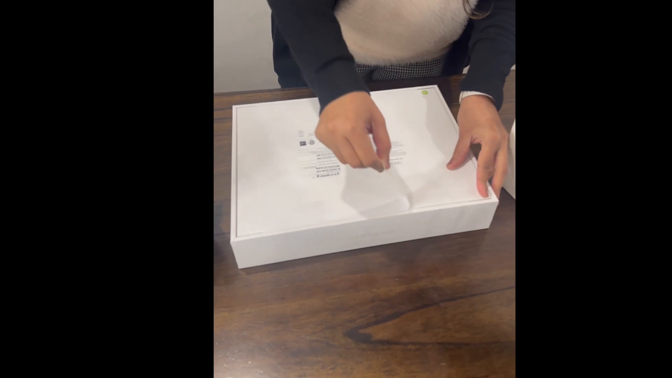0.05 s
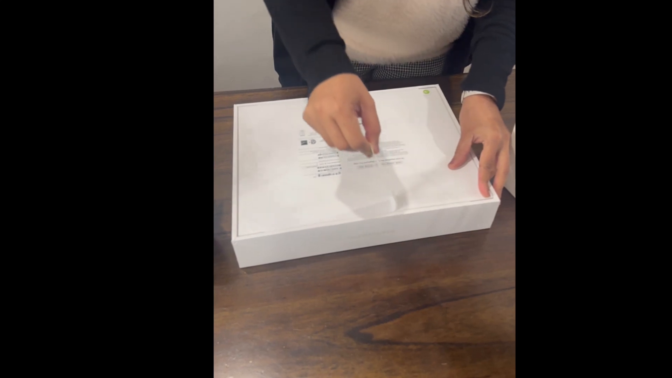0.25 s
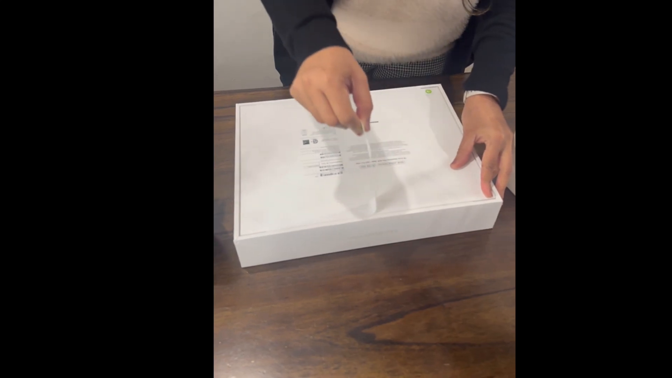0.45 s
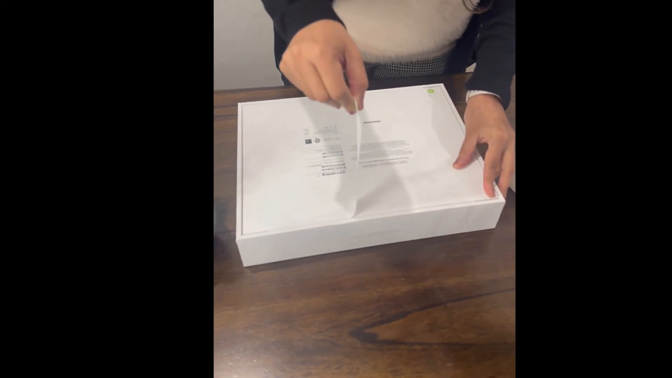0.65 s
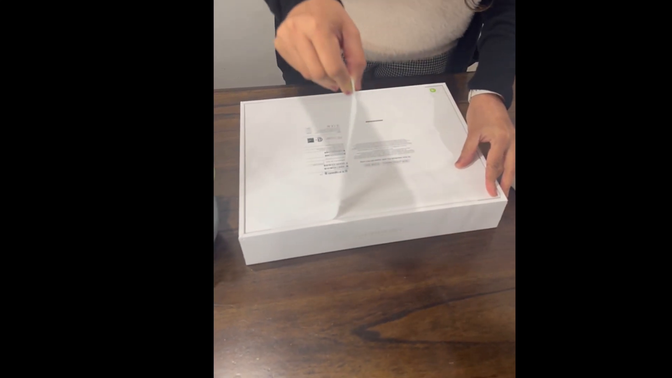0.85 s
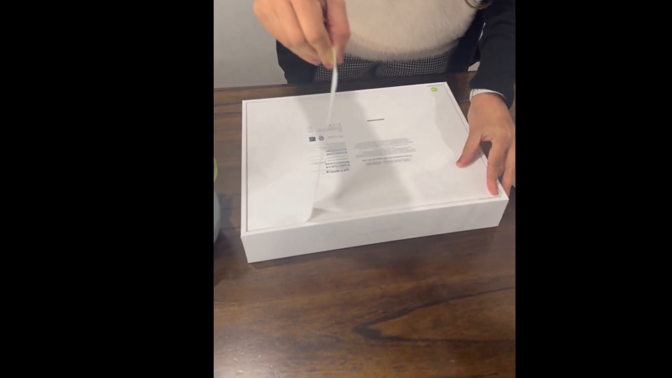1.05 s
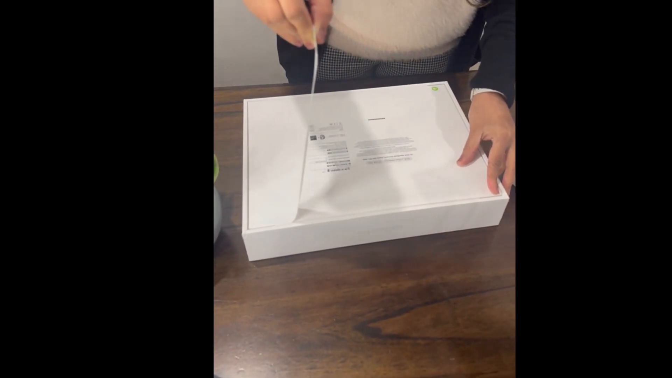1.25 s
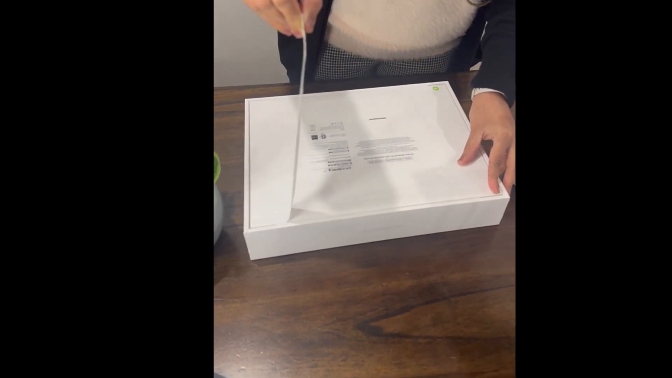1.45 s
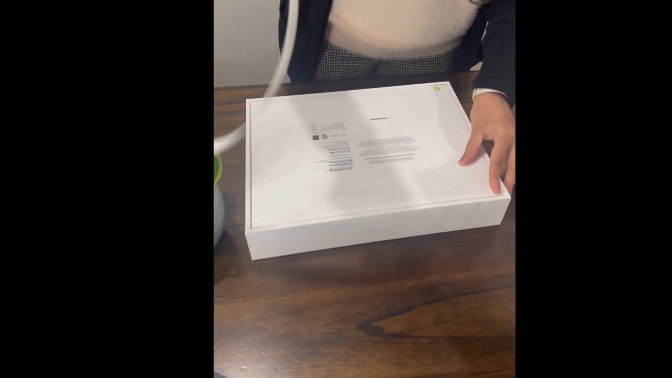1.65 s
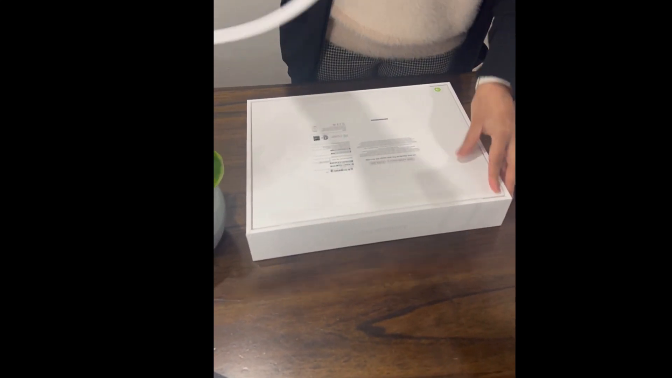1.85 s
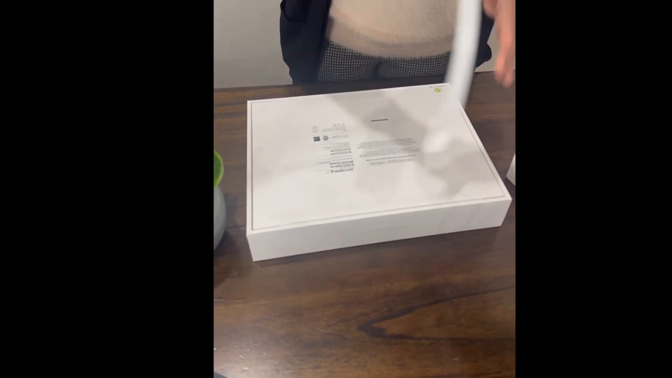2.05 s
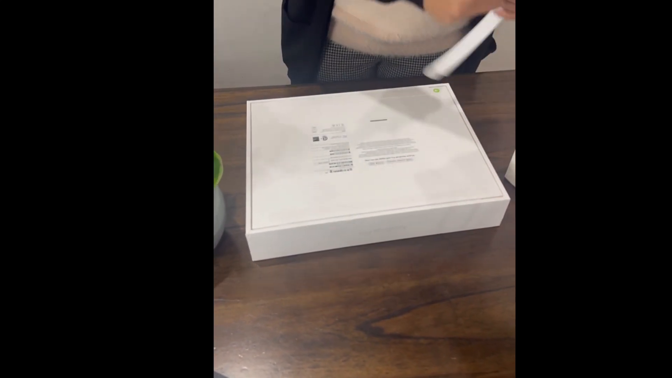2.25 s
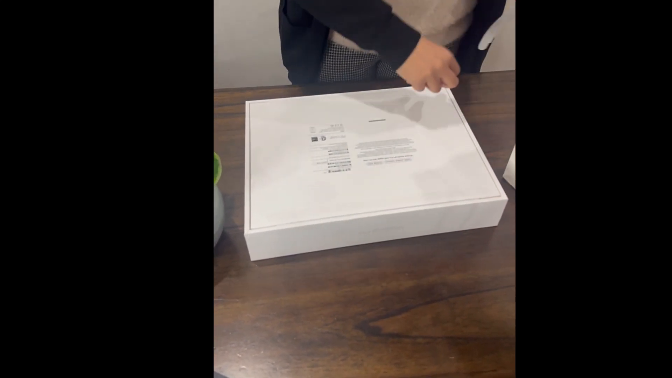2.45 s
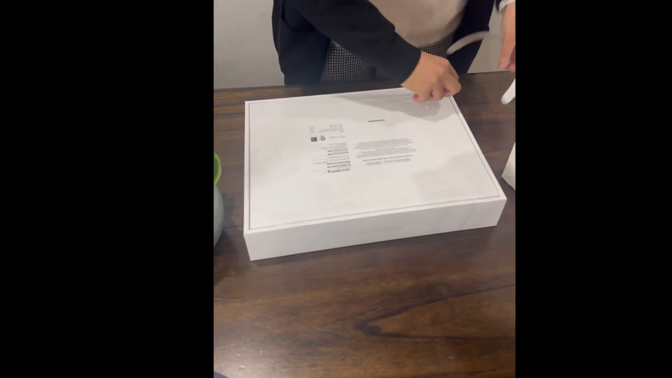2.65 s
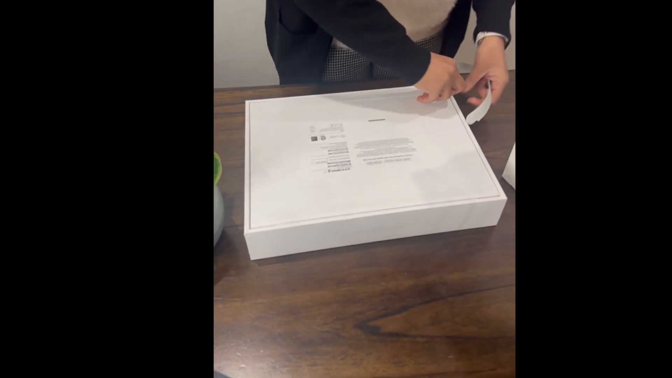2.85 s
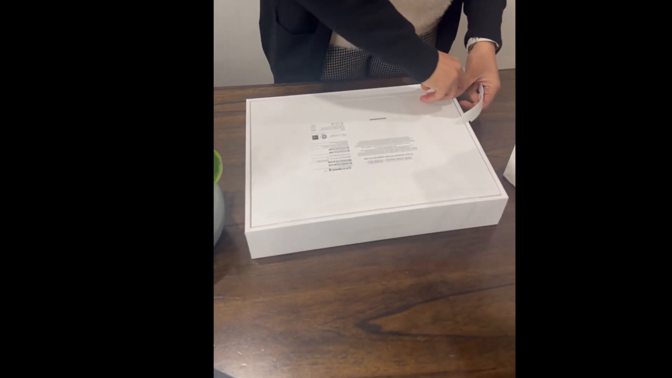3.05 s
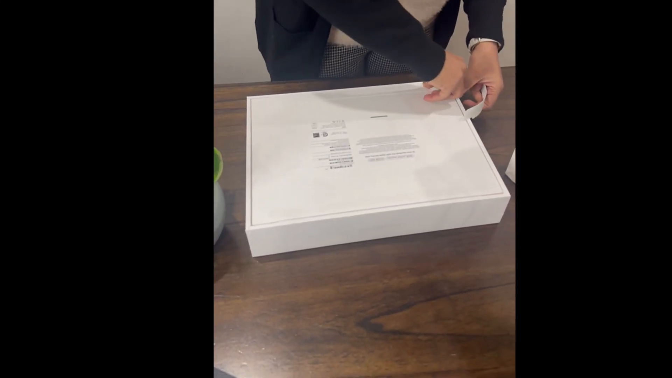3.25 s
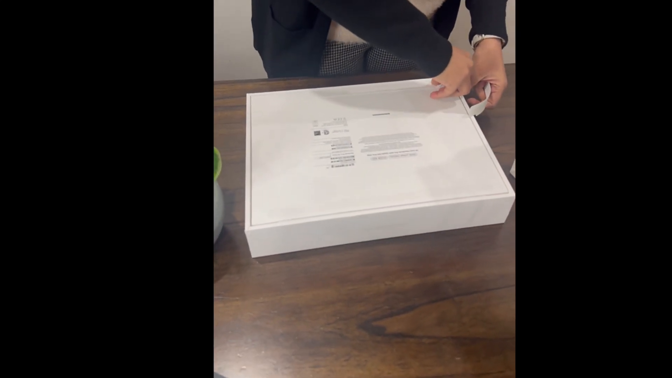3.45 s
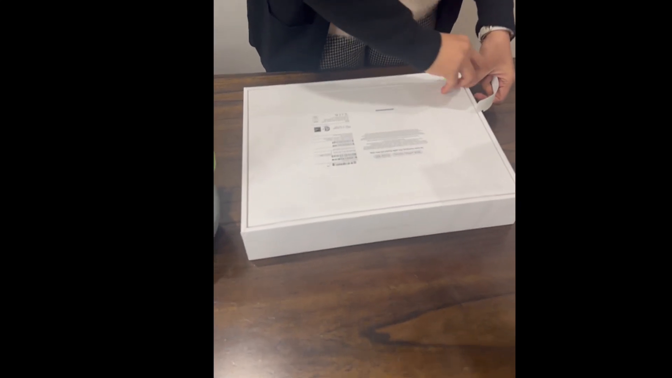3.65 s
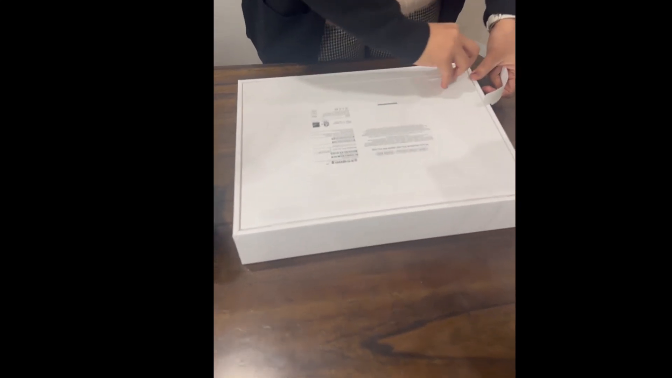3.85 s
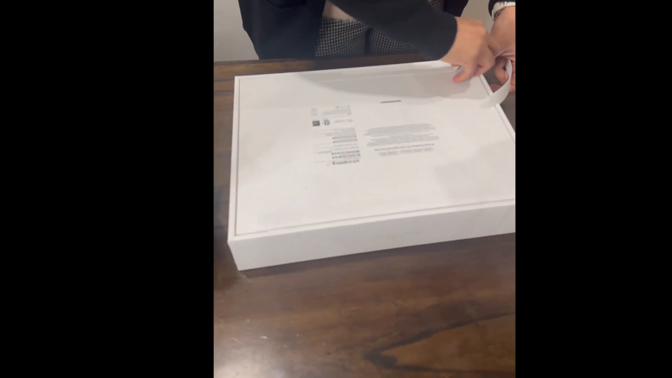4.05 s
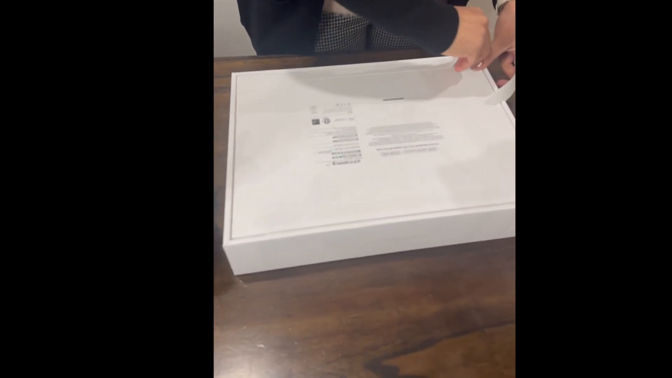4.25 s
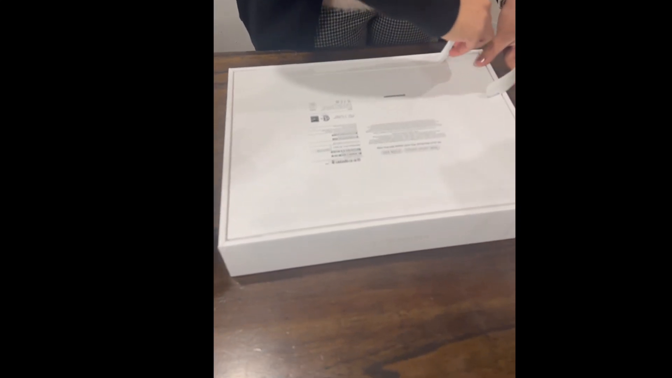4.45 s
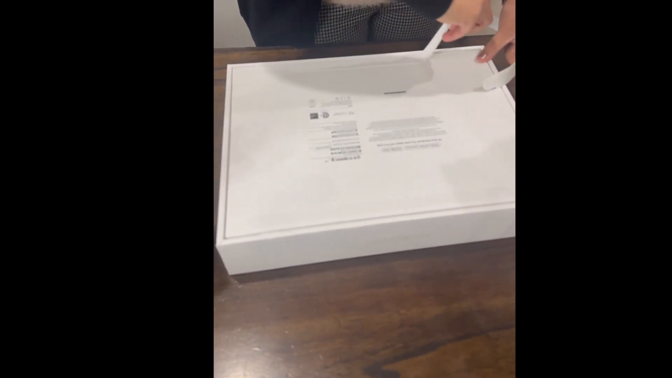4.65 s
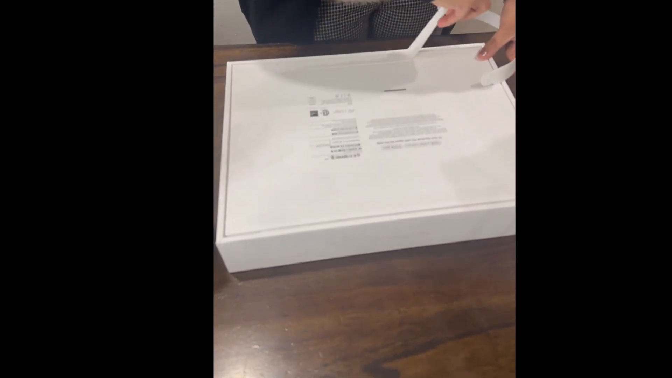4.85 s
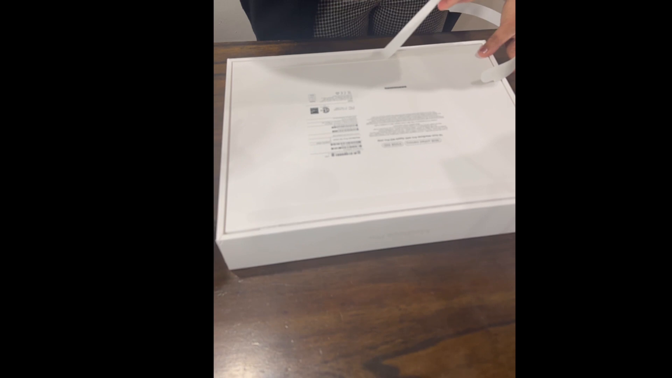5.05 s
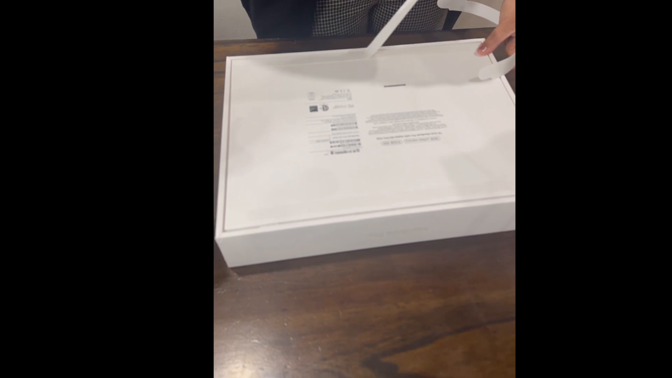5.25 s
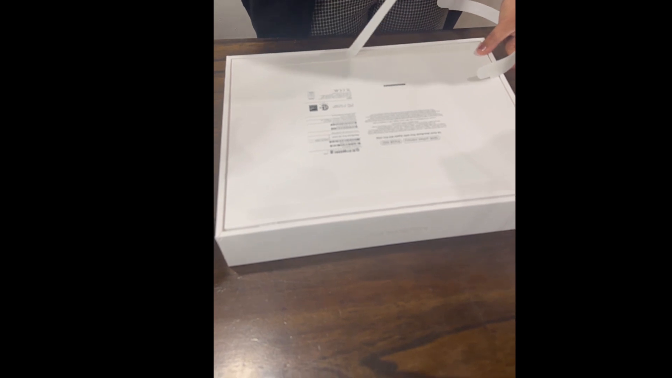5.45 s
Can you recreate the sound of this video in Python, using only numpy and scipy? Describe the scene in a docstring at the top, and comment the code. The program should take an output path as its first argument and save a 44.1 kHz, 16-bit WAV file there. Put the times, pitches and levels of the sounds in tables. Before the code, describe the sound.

A paper seal strip rips off a hollow cardboard box in rasping bursts, snaps free with a sharp click, then a second strip tears jerkily.

```python
"""In a small room, two paper seal strips are ripped off a stiff cardboard box on a wooden table.
Tears: uneven stick-slip bursts of shaped noise, which also drive modal filters of the hollow box.
The first strip comes free with cracks: fast-fading noise, box thumps and short sine rings.
Box knocks are sums of swelling sines; rubbing, rustle and sliding are noise under gain curves.
A noise reverb adds the room; a low rumble and one faint whine run throughout."""
import sys
import numpy as np
from scipy import signal
from scipy.fft import rfft, irfft
from scipy.io import wavfile

SR = 44100
rng = np.random.default_rng(int(sys.argv[2]) if len(sys.argv) > 2 else 0)


def transcribe(u):
    """Save the signal u as a 16-bit wav file named by the first command-line argument.

    u: samples, shape (n,) or (channels, n), limited to [-1, 1]; the rate is SR.
    q: integer samples, one column per channel.
    """
    v = np.clip(np.atleast_2d(u).T, -1, 1)
    q = np.round(v * 32767).astype(np.int16)
    wavfile.write(sys.argv[1], SR, q)


N = 242984
TIME = np.arange(N) / SR
GRID_HZ = np.linspace(0, SR / 2, 2049)
SECOND_START_S = 4.22  # split between the two tears
PORT_PHASE_RAD = 0.33  # knocks and rings lead by this at left, lag by it at right

# strip lets go and whips, then paper ticks on box:
# t/s, crack level/dB, fade/s, ring f/Hz, ring level/dB, box thump level/dB
CRACK_EVENTS = [(1.5601, -22.5, 0.0043, 1140, -17, -15.5), (1.5736, -8, 0.004, 2670, -14.5, -18.5),
                (1.577, -24, 0.00096, 1880, -13.5, -11.5), (1.6869, -21.5, 0.0027, 3550, -22, -55.5),
                (1.698, -37, 0.0018, 3480, -35, -56), (1.8286, -38, 0.0041, 2480, -33, -55),
                (1.8342, -42, 0.0013, 8200, -43, -22.5), (1.843, -50, 0.0053, 2300, -50, -56),
                (1.870, -39, 0.00087, 7200, -54, -60), (2.277, -45, 0.0013, 6200, -45, -72),
                (2.288, -38, 0.0016, 6400, -39, -73), (2.301, -49, 0.002, 5600, -37, -72),
                (2.313, -48, 0.002, 6500, -39, -70), (2.881, -48, 0.0028, 2300, -47, -58.5),
                (2.8952, -42.5, 0.0022, 2630, -33.5, -56.5), (2.9026, -50, .003, 1750, -36, -60),
                (2.918, -54, 0.0024, 2550, -40, -58), (3.254, -43.5, 0.00076, 1520, -40.5, -55.5),
                (3.585, -50, .002, 3720, -49, -59), (3.607, -46, 0.0019, 6700, -50, -55)]
# left-right likeness of diffuse sound: f/Hz, likeness (-1..1, clipped in use)
DIFFUSE_LIKENESS = [(60, 1), (130, 0.94), (300, 0.89), (640, -0.29), (1400, 0.46), (3100, -0.45),
                    (7000, 0.93), (9500, -0.1), (11000, -1.6), (16000, -.9)]


def amp(db):
    """Decibels to gain."""
    return np.exp(np.asarray(db) * (np.log(10) / 20))


def rms_one(x):
    """Scales to an rms of 1."""
    return x / np.sqrt(np.mean(x ** 2) + 1e-20)


def on_grid(points):
    """Interpolates (Hz, value) points along log frequency."""
    hz, value = np.transpose(points)
    return np.interp(np.log(GRID_HZ + 1), np.log(hz), value)


def causal(gain):
    """Minimum-phase impulse response of a gain curve, by cepstrum folding."""
    cepstrum = irfft(np.log(gain + 1e-9))
    half = len(cepstrum) // 2
    folded = np.r_[cepstrum[0], 2 * cepstrum[1:half], np.zeros(half + 1)]
    return irfft(np.exp(rfft(folded)))


def at_ports(pair, spectrum, likeness):
    """Colours two unrelated signals as mid and side, returns left and right; white mid keeps its rms."""
    gain = amp(on_grid(spectrum))
    alike = np.clip(on_grid(likeness), -.995, .995)
    kernels = np.array([causal(gain * np.sqrt(1 + alike)), causal(gain * np.sqrt(1 - alike))])
    kernels /= np.linalg.norm(kernels[0])
    mid, side = signal.oaconvolve(pair, kernels, axes=1)[:, :N]
    return np.array([mid + side, mid - side])


def clicks(times, sizes):
    """One impulse of the given size at each time."""
    samples = np.round(np.asarray(times) * SR).astype(int)
    return np.bincount(np.clip(samples, 0, N - 1), sizes, N)


def bursts(hits, fade_s):
    """Envelope that jumps at each hit and decays; overlaps add in power."""
    power = signal.lfilter([1], [1, -np.exp(-2 / (fade_s * SR))], hits ** 2 + 1e-18)
    return np.sqrt(power)


def drift(per_s):
    """Random piecewise-linear curve with per_s knots a second; spread near 1."""
    knots = rng.standard_normal(4000)
    return np.interp(TIME * per_s, np.arange(len(knots)), knots)


def fibres(spread_db):
    """Two noise streams of tiny snaps with unequal, shared random gain."""
    unequal = amp(spread_db * np.clip(rng.standard_normal(N), -2, 2))
    return rms_one(rng.standard_normal((2, N)) * unequal)


def changing_colour(x, snap_db, clump_db):
    """Snaps and clumps shake different card patches: band gains drift fast and slowly."""
    split_hz = np.geomspace(900, 9000, 8)
    lows = [signal.sosfilt(signal.butter(2, hz, fs=SR, output="sos"), x) for hz in split_hz]
    bands = np.diff([0 * x, *lows, x], axis=0)
    gains = amp([snap_db * drift(130) + clump_db * drift(12) for _ in bands])
    gains /= np.sqrt(np.mean(gains ** 2, axis=0))
    return np.einsum("bn,bcn->cn", gains, bands)


def stroke(start_s, length_s, attack_s, release_s):
    """Gain of a movement: linear attack, hold, exponential release."""
    t = TIME - start_s
    return np.clip(t / attack_s, 0, 1) * np.exp(-np.maximum(t - length_s, 0) / release_s)


def room_tone(rumble_db, whine_hz, whine_db):
    """Ventilation rumble as coloured noise, plus one faint sine whine."""
    # rumble spectrum: f/Hz, relative level/dB
    rumble_spectrum = [(20, -20), (38, -19), (58, 8.5), (85, -6), (110, -6), (180, -1.5), (300, -4.5),
                       (420, -8.5), (520, -16.5), (850, -20.5), (1500, -30.5), (3000, -36), (8500, -47),
                       (11000, -56.5)]
    rumble = at_ports(rng.standard_normal((2, N)), rumble_spectrum, DIFFUSE_LIKENESS)
    whine = np.sin(2 * np.pi * whine_hz * TIME)
    return amp(rumble_db) * rumble + amp(whine_db) * whine


def pulling_force(tilt):
    """Maximum of long draw, short tugs and held tension; positive tilt favours bright pulls."""
    # long draw on first strip, stalling near its end: t/s, force/dB, brightness/dB
    draw_points = [(0.0, 0, 0.5), (0.09, -6, -5), (0.145, -13.5, 5.5), (0.181, -4, -1.5),
                   (0.235, -8.5, 0.5), (0.29, 1, -2.5), (0.55, -1.5, -0.5), (0.604, -3.5, -4.5),
                   (0.735, -8, 0), (0.84, 1, -2), (1.04, -1, -2), (1.075, -7, -1), (1.12, -5.5, 1),
                   (1.312, -7.5, 0.5), (1.345, -19.5, 0.5), (1.44, -29.5, 5.5)]
    # tugs finish first strip and work second loose: start/s, length/s, force/dB, brightness/dB
    tug_rows = [(1.44, 0.034, -4, -1), (1.494, 0.068, -2, -3), (1.529, 0.04, 2, 2), (4.232, 0.089, -7, 0.5),
                (4.27, 0.036, -2.5, 1.5), (4.341, 0.1, -2.5, 0.5), (4.446, 0.11, -1.5, -6),
                (4.564, 0.05, -0.5, -0.5), (4.626, 0.025, 0.5, -0.5), (4.69, 0.092, -1.5, -1.5),
                (4.807, 0.018, 3.5, 1.5), (4.855, 0.029, -4.5, -10), (4.913, 0.011, 0.5, -7),
                (4.955, 0.054, 3, 2), (4.991, 0.057, 2.5, -6.5), (5.045, 0.042, -4, -3),
                (5.218, 0.06, 0, 0), (5.262, 0.071, -1.5, -4.5), (5.38, 0.036, 1.5, -0.5),
                (5.487, 0.029, 5, 3)]
    attack_s, release_s = 0.017, 0.0086
    tension_db, tension_rise_s = -12.5, 0.092  # keeps second strip creeping between tugs
    when_s, db, bright_db = np.transpose(draw_points)
    draw = amp(np.interp(TIME, when_s, db + tilt * bright_db)) * (TIME <= when_s[-1])
    tugs = [amp(tug_db + tilt * tug_bright_db) * stroke(start_s, length_s, attack_s, release_s)
            for start_s, length_s, tug_db, tug_bright_db in tug_rows]
    tension = amp(tension_db) * np.clip((TIME - SECOND_START_S) / tension_rise_s, 0, 1)
    return np.max([draw, tension, *tugs], axis=0)


def snags(force, per_s, spread_db):
    """Tougher seal spots give way at random: times, then impulses for card, fibres and box."""
    chance = rng.random((400, 4))
    times = np.cumsum(.4 + 1.2 * chance[:, 0]) / per_s
    in_scene = times < TIME[-1]
    hits = [force * clicks(times, amp(-spread_db * share) * in_scene) for share in chance[:, 1:].T]
    return times, *hits


def sticking(times, stick_s, stick_db):
    """The tear stalls as tension builds: gain dips ahead of each given slip."""
    ahead = bursts(clicks(times, np.ones(len(times)))[::-1], stick_s)[::-1]
    return amp(stick_db * np.minimum(ahead, 1))


def slip_bursts(hits, fade_s, rise_s=0.0019):
    """A slip gathers speed over about a millisecond before it dies away."""
    return bursts(bursts(hits, fade_s), rise_s) * np.sqrt(2 / (rise_s * SR))


def strip_resonance(x, hz, width_hz, lift):
    """Lifts a narrow band at a moving centre by heterodyne one-pole; keeps overall level."""
    turn = np.exp(2j * np.pi * np.cumsum(hz) / SR)
    r = np.exp(-np.pi * width_hz / SR)
    baseband = signal.lfilter([1 - r], [1, -r], x * turn.conj() + 1e-18)
    out = x + lift * 2 * (baseband * turn).real
    return out * np.std(x) / np.std(out)


def off_the_lid(x, delay_s, wander_s, share):
    """The lid mirrors the travelling tear: a wandering delay makes a moving comb."""
    late = TIME - delay_s - wander_s * drift(1.2)
    mirrored = np.array([np.interp(late, TIME, side) for side in x])
    return (x + share * mirrored) / np.hypot(1, share)


def box(force, edge=0):
    """Lid and enclosed air ring in modes; drive levels wander as the contact crosses their nodes."""
    # box modes: f/Hz, t60/s, then relative drive/dB at front edge, back edge, lid springing back
    modes = [(61, 0.23, -16.5, -38, -18.5), (95, 0.097, -5.5, -36, -1), (132, 0.23, -9.5, 0.5, -6.5),
             (189, 0.053, -1, -33, 2.5), (234.4, 0.089, -3, 3, -5), (272, 0.11, -7, 5, -10),
             (307.4, 0.048, 0, -17, -19), (420, 0.045, -5, -18, -10), (445, 0.046, -26.5, -39, -9),
             (578, 0.037, -1.5, -1, -12)]
    flex_s, flex_per_s = 0.0014, 14  # lid flexes under the hands, warping its ringing in time
    out = 0
    for hz, t60_s, *drive_db in modes:
        r = amp(-60 / (t60_s * SR))
        w = 2 * np.pi * hz / SR
        drive = force * amp(drive_db[edge] + 2.5 * drift(6))
        out = out + signal.lfilter([1, -r * np.cos(w)], [1, -2 * r * np.cos(w), r * r], drive + 1e-18)
    out = np.interp(TIME - flex_s * drift(flex_per_s), TIME, out)
    # bending-wave dispersion: allpass spreads each blow around 240 Hz
    _, spread = signal.iirpeak(240, 1.5, fs=SR)
    out = signal.lfilter(spread[::-1], spread, out)
    return signal.sosfilt(signal.butter(2, [55, 650], "band", fs=SR, output="sos"), out) / 2


def tear(span_s, strip, rasp_spectrum, fizz_spectrum, edge, slips_per_s, uneven_db, fade_s,
         rasp_db, fizz_db, boom_db, boom_follows, boom_db_per_s, snags_per_s, snag_db, snag_boom_db,
         slip_rasp_db, slip_fizz_db, strip_lift):
    """Stick-slip: slips snap fibres and tug the box, over steady glue drag; all follow the pull."""
    # strongest slips: t/s, card rasp/dB, fibre snap/dB (both before slip offsets), box thump/dB
    strong_slips = [(0.0144, -20, -27, -54), (0.0222, -20, -37, -44), (0.0476, -21, -22, -43),
                    (0.068, -25.5, -23, -46), (0.0856, -20.5, -35, -52), (0.1217, -19, -21.5, -47),
                    (0.1756, -27, -24, -33.5), (0.196, -29, -23, -33), (0.2397, -21, -19.5, -50),
                    (0.246, -24, -20, -48), (0.27, -25.5, -21, -47), (0.2924, -22, -30, -51),
                    (0.3281, -14, -18, -50), (0.3387, -17.5, -19, -42), (0.348, -22, -15, -28),
                    (0.3632, -29, -17.5, -39), (0.404, -20, -27, -55), (0.4198, -22, -26, -48),
                    (0.4461, -29, -26, -34), (0.4589, -20, -16.5, -26), (0.4832, -21, -23, -43),
                    (0.494, -20, -25, -38), (0.5035, -21, -20, -36), (0.5251, -20.5, -22, -25),
                    (0.536, -20, -28, -28), (0.549, -18.5, -21, -33), (0.5618, -26, -19, -24),
                    (0.5883, -24, -38, -40), (0.6113, -21, -28, -26.5), (0.6275, -27, -32, -31),
                    (0.6588, -20, -14.5, -27.5), (0.6693, -38, -22.5, -42), (0.6887, -24, -24, -48),
                    (0.705, -34, -29, -38), (0.723, -29, -38, -35), (0.7529, -21, -21.5, -31),
                    (0.7724, -22, -25, -36), (0.7845, -25, -35, -42), (0.8101, -17.5, -25, -33),
                    (0.8278, -21.5, -29, -36), (0.8486, -15, -23, -39), (0.8717, -20, -15, -28),
                    (0.9388, -19, -19, -33), (0.983, -21, -28, -49), (1.0255, -15.5, -14, -32),
                    (1.032, -19, -23, -38), (1.037, -20.5, -24, -39), (1.0636, -32, -31, -37),
                    (1.084, -22, -28, -24.5), (1.1052, -21, -27, -40), (1.1569, -16, -14.5, -21),
                    (1.2213, -31, -23.5, -42), (1.4533, -27.5, -24, -34), (1.516, -22.5, -24, -40),
                    (1.5458, -26.5, -35, -26.5), (4.274, -39.5, -24, -44.5), (4.3, -27.5, -24, -32),
                    (4.347, -32.5, -26, -53), (4.3816, -42, -24, -50), (4.3996, -33, -23, -41),
                    (4.4242, -31, -22.5, -34.5), (4.4614, -28, -23, -33.5), (4.4889, -32, -19.5, -37),
                    (4.5145, -27, -18.5, -38), (4.5233, -36, -27, -45), (4.5336, -32, -24, -33.5),
                    (4.5525, -26, -21, -50), (4.5606, -25.5, -16.5, -57), (4.5847, -28, -20, -34),
                    (4.5974, -21, -17, -52), (4.6471, -41, -22.5, -27), (4.7221, -33, -28, -29),
                    (4.7448, -37, -23, -34), (4.7613, -40, -26, -43), (4.8266, -35, -22, -36),
                    (4.8639, -32, -23, -31), (4.8772, -31, -18, -34), (4.901, -36, -36, -36),
                    (4.9589, -30, -30, -29), (4.9854, -31, -26, -29), (5.003, -24.5, -28, -31),
                    (5.0083, -28, -16, -36), (5.0239, -34, -15, -50), (5.0409, -29, -27, -40),
                    (5.0699, -24, -24, -50), (5.1327, -34, -23, -27.5), (5.2276, -27.5, -23.5, -30.5),
                    (5.2444, -27, -36, -39), (5.2774, -36, -20, -36), (5.298, -44, -29, -23.5),
                    (5.319, -37, -33, -27.5), (5.4122, -30, -22.5, -28), (5.476, -28, -24, -54),
                    (5.4875, -29, -25, -52), (5.5043, -32, -18, -55)]
    # left-right likeness close by: f/Hz, likeness (-1..1, clipped in use)
    near_likeness = [(60, 1), (270, 1), (450, -1), (740, -0.096), (1220, 0.82), (2000, 0.92), (3300, -0.43),
                     (5500, 0.67), (9300, 0.51), (10200, -0.77), (11000, -0.99), (14000, -1.3),
                     (15500, 0.59)]
    patch_hz, patch_octaves, patches_per_s = 1670, 0.45, 55  # middle pitch, spread, change rate
    patch_width_hz, patch_lift = 190, 1.2
    flutter_share, flutter_per_s = 0.011, 9  # strip bending detunes its resonances

    start_s, end_s = span_s
    active = (TIME >= start_s) * (TIME < end_s)
    card_force, force, fibre_force = [pulling_force(tilt) * active for tilt in (-.5, 0, .5)]
    # boom grows as the tear travels out over the lid
    boom = force ** boom_follows * amp(boom_db_per_s * (TIME - start_s))
    rows = [row for row in strong_slips if start_s <= row[0] < end_s]
    slip_s, card_db, fibre_db, thump_db = np.transpose(rows)
    stalling = sticking(slip_s, stick_s=.009, stick_db=-7)
    snag_s, snag_rasp, snag_fizz, snag_boom = snags(force * stalling, snags_per_s, spread_db=5.5)

    # small slips: uneven gaps and sizes
    chance = rng.random((1500, 2))
    times = np.cumsum(.25 + 1.5 * chance[:, 0]) / slips_per_s
    small = clicks(times, amp(uneven_db * chance[:, 1]) * (times < TIME[-1]))
    crackle = rms_one(slip_bursts(small, fade_s))
    # steady glue drag equals the crackle in rms
    grain = stalling * np.hypot(crackle, 1) * sticking(snag_s, stick_s=.006, stick_db=-6)

    card_hits = clicks(slip_s, amp(card_db + slip_rasp_db)) + amp(snag_db) * snag_rasp
    card = np.hypot(amp(rasp_db) * card_force * grain, slip_bursts(card_hits, fade_s))
    fibre_hits = clicks(slip_s, amp(fibre_db + slip_fizz_db)) + amp(snag_db) * snag_fizz
    fibre = np.hypot(amp(fizz_db) * fibre_force * grain, slip_bursts(fibre_hits, fade_s))
    card = at_ports(card * fibres(spread_db=3.2), rasp_spectrum, near_likeness)
    fibre = at_ports(fibre * fibres(spread_db=3.5), fizz_spectrum, near_likeness)

    # each loosened card patch rings at its own pitch
    patch_pitch_hz = patch_hz * 2 ** (patch_octaves * drift(patches_per_s))
    card = strip_resonance(card, patch_pitch_hz, patch_width_hz, patch_lift)
    # taut strip rings along
    when_s, *centres_hz = np.transpose(strip)
    lower_hz, upper_hz = [np.interp(TIME, when_s, hz) * (1 + flutter_share * drift(flutter_per_s))
                          for hz in centres_hz]
    paper = strip_resonance(card, lower_hz, width_hz=300, lift=strip_lift)
    paper = paper + strip_resonance(fibre, upper_hz, width_hz=600, lift=strip_lift)
    paper = changing_colour(paper, snap_db=4.2, clump_db=3.5)
    paper = off_the_lid(paper, delay_s=.0009, wander_s=.00009, share=.4)

    # small-slip drive normalised by the box response
    jolts = amp(boom_db) * boom * small / np.std(box(small, edge))
    jolts = jolts + amp(snag_boom_db) * snag_boom + clicks(slip_s, amp(thump_db))
    return paper + box(jolts, edge)


def leaning(x):
    """Shares each pitch unevenly between left and right."""
    # stereo lean: f/Hz, left minus right level/dB
    lean = [(130, 3), (290, -3.5), (420, -4), (640, 6.5), (1400, 0.5), (3100, 2.5), (6800, -0.5),
            (15000, -2)]
    kernels = np.array([causal(amp(sign * on_grid(lean) / 2)) for sign in (1, -1)])
    return signal.oaconvolve(x, kernels, axes=1)[:, :N]


def room(x, onset_s, bass_db, bass_t60_s):
    """Dense reflections as decaying noise, bass lasting longer; mid and side have separate tails."""
    # reflection colour: f/Hz, level/dB
    colour = [(300, 0), (1100, -1), (2600, -2.5), (4500, -0.5), (8500, -0.5), (12000, -6.5)]
    t60_s, level_db = 0.3, -4.5
    t = TIME[:int(.7 * SR)]
    noise = rng.standard_normal((2, len(t))) * (1 - np.exp(-t / onset_s))
    bass = signal.sosfilt(signal.butter(1, 450, fs=SR, output="sos"), noise)
    tail = (noise - bass) * amp(-60 * t / t60_s) + bass * amp(bass_db - 60 * t / bass_t60_s)
    tail /= np.linalg.norm(tail, axis=1, keepdims=True)
    tail = signal.oaconvolve(tail, [causal(amp(on_grid(colour)))], axes=1)
    mid_side = np.array([x[0] + x[1], x[0] - x[1]]) / 2
    mid, side = signal.oaconvolve(mid_side, tail, axes=1)[:, :N]
    return amp(level_db) * np.array([mid + side, mid - side])


def cracks(fade_shape):
    """Each crack is milliseconds of noise that breaks off fast, plus a thump of the whole lid."""
    # crack spectrum: f/Hz, relative level/dB
    crack_spectrum = [(200, -9.5), (500, 0.5), (1100, -1), (1500, -2.5), (2000, 3.5), (3200, 6), (4400, 3),
                      (6000, 6), (7500, 6), (9200, 5), (11000, -16.5), (16000, -10.5)]
    # left-right likeness: f/Hz, likeness (-1..1)
    likeness = [(270, 0.79), (600, 0.73), (1200, 0.69), (3300, -0.38), (5500, 0.82), (8800, -0.083),
                (10500, -0.23), (15500, 0.32)]
    pair, t = np.zeros((2, N)), TIME[:SR // 10]
    for when_s, db, fade_s, *_ in CRACK_EVENTS:
        start = round(when_s * SR)
        fade = np.exp(-(t / fade_s) ** fade_shape)
        pair[:, start:start + len(t)] += amp(db) * fade * rng.standard_normal((2, len(t)))
    times, *_, thump_db = np.transpose(CRACK_EVENTS)
    thumps = box(clicks(times, amp(thump_db)), edge=2)
    return at_ports(pair, crack_spectrum, likeness) + thumps


def card_rings(t60_s):
    """Card rings after each crack: a decaying sine, phase-shifted between the sides."""
    out, t = np.zeros((2, N)), TIME[:SR // 10]
    for when_s, _, _, hz, db, _ in CRACK_EVENTS:
        start = round(when_s * SR)
        wave = np.sin(2 * np.pi * hz * t + PORT_PHASE_RAD * np.array([[1], [-1]]))
        out[:, start:start + len(t)] += amp(db - 60 * t / t60_s) * wave
    return out


def swell(peak_s, rise_s, fall_s):
    """Gain of a brushing movement: exponential rise to a peak and fall."""
    distance = np.maximum((peak_s - TIME) / rise_s, (TIME - peak_s) / fall_s)
    return np.exp(-np.clip(distance, 0, 20))


def swells(rows):
    """One gain curve per dB column of a movement table; movements add in power."""
    shapes = np.array([swell(*row[:3]) for row in rows])
    return np.sqrt(amp(np.array(rows)[:, 3:].T) ** 2 @ shapes ** 2)


def handling(creases_per_s, crease_db):
    """Hands and sleeves rub, paper rustles as creases flip, card slides with a fine hiss."""
    # hands and sleeves on box: peak t/s, rise/s, fall/s, level/dB
    rubs = [(1.855, 0.0088, 0.037, -45.5), (2.158, 0.008, 0.012, -50), (2.905, 0.014, 0.059, -43.5),
            (3.045, 0.02, 0.022, -53), (3.582, 0.019, 0.018, -49), (3.99, 0.067, 0.075, -50.5)]
    # loose strip through air and fingers: peak t/s, rise/s, fall/s, rustle level/dB, hiss level/dB
    swishes = [(1.905, 0.051, 0.031, -52, -50.5), (2.158, 0.0062, 0.023, -42, -45),
               (2.305, 0.033, 0.026, -47, -48), (2.476, 0.0072, 0.027, -47, -49.5),
               (2.62, 0.2, 0.085, -59, -60), (2.93, 0.051, 0.063, -50, -57.5),
               (3.052, 0.03, 0.03, -55.5, -63), (3.585, 0.0073, 0.031, -57, -53),
               (4.0, 0.16, 0.17, -58, -64)]
    # spectra: f/Hz, relative level/dB
    rub_spectrum = [(250, -19), (600, 2.5), (800, 8), (1200, -8), (1800, -0.5), (2300, -18), (3200, -7),
                    (8000, -54)]
    rustle_spectrum = [(700, -27.5), (1700, -9), (2400, 3), (3000, 3), (3700, 3), (4800, -6), (6200, 1),
                       (7300, -24), (9500, -21), (14000, -41.5)]
    slide_spectrum = [(2000, -34), (4800, -14), (6200, -5.5), (8000, -3), (9200, -4.5), (10500, -17),
                      (13000, -25), (16000, -9)]
    # box slowly turned on the table, its hiss swelling
    turn_start_s, turn_end_s, turn_ramp_s = 3.26, 4.24, 0.034
    turn_db, turn_db_per_s = -59.5, 4

    rub, = swells(rubs)
    rustle, hiss = swells(swishes)
    turning = amp(turn_db + turn_db_per_s * (TIME - turn_start_s))
    turning = turning * stroke(turn_start_s, turn_end_s - turn_start_s, turn_ramp_s, turn_ramp_s)
    slide = np.hypot(turning, hiss)
    creases = (rng.random(N) < creases_per_s / SR) * amp(crease_db * rng.random(N))
    crinkle = rms_one(np.hypot(bursts(creases, .0015), .7) * amp(2.5 * drift(45)))
    rubbing = at_ports(rub * crinkle * fibres(spread_db=0.0), rub_spectrum, DIFFUSE_LIKENESS)
    paper = at_ports(rustle * crinkle * fibres(spread_db=3.5), rustle_spectrum, DIFFUSE_LIKENESS)
    sliding = at_ports(slide * fibres(spread_db=5.5), slide_spectrum, DIFFUSE_LIKENESS)
    return changing_colour(rubbing + paper, snap_db=5, clump_db=3) + sliding


def knocks():
    """Bending waves in the stiff panel: modes swell and die in a few cycles, low ones last."""
    # hand and box on table: t/s, clack level/dB, lowest ring f/Hz, brightness/(dB/octave), thud level/dB
    blows = [(1.828, -24, 1120, 1.5, -22), (1.8311, -24.5, 493, -10, -20.5), (1.8388, -35, 642, -11, -23.5),
             (2.8734, -21, 860, 4.5, -37), (2.878, -38, 763, 7, -23), (2.8966, -30, 950, -6, -40),
             (2.9023, -41, 840, 11, -37), (2.938, -49, 905, 5, -46), (3.55, -46, 1130, 5, -54),
             (3.584, -39.5, 1040, 11, -46), (3.605, -52, 1050, 10, -54)]
    # panel modes: multiple of lowest ring, relative level/dB
    panel = [(1, 1.5), (1.42, -2.5), (1.95, -2.5), (3.0, -19), (4.1, -17), (6.4, -37.5)]
    panel_q = 3.97
    thud_hz, thud_q = 306, 2.5  # side wall bends as a whole
    out, t = np.zeros((2, N)), TIME[:SR // 10]
    for when_s, db, ring_hz, bright_db, thud_db in blows:
        start = round(when_s * SR)
        modes = [(ring_hz * ratio, panel_q, db + mode_db + bright_db * np.log2(ratio))
                 for ratio, mode_db in panel]
        for hz, q, level_db in [*modes, (thud_hz, thud_q, thud_db)]:
            age = np.pi * hz * t / q  # 1 at the top of the swell
            envelope = age ** 1.5 * np.exp(1.5 - 1.5 * age)
            wave = np.sin(2 * np.pi * hz * t + PORT_PHASE_RAD * np.array([[1], [-1]]))
            out[:, start:start + len(t)] += amp(level_db) * envelope * wave
    return out


def scene():
    """Tears, cracks and knocks in the room, plus handling noise and room tone."""
    # strip resonances shift as the strip lengthens: t/s, lower f/Hz, upper f/Hz
    first_strip = [(0.0, 3000, 6140), (0.421, 3660, 8250), (0.799, 4090, 8100), (1.56, 3800, 7950)]
    second_strip = [(4.252, 2270, 7440), (4.4, 2260, 6260), (4.62, 2120, 5900), (4.78, 3020, 8370),
                    (5.05, 3230, 7700), (5.51, 2780, 8000)]
    # card rasp and fibre fizz spectra: f/Hz, relative level/dB
    first_rasp = [(200, -4.5), (480, 7), (620, 5), (800, 1), (1000, -0.5), (1170, 4.5), (1420, -4.5),
                  (1800, 7), (2200, -0.5), (2600, 1.5), (3500, 5.5), (4400, -5), (5300, -8.5), (8000, -34)]
    second_rasp = [(200, 15), (560, 11), (740, 12.5), (1020, 0.5), (1250, 4.5), (1550, 6.5), (2300, -0.5),
                   (2650, 6), (3150, 6.5), (4000, 9.5), (5000, -11.5), (8000, -53)]
    first_fizz = [(2500, -10.5), (4800, -16), (5700, -2), (6500, -5.5), (7300, -0.5), (7900, -8),
                  (8900, -0.5), (10000, -5.5), (10900, -16.5), (13000, -7.5), (15800, -15)]
    second_fizz = [(2500, -54), (4800, -4.5), (6200, -1.5), (7000, -5), (8200, -1.5), (9400, -1.5),
                   (10600, 0.5), (12500, -2), (15000, -1.5), (16000, -30)]
    first = tear(
        (0, SECOND_START_S), first_strip, first_rasp, first_fizz, edge=0,
        slips_per_s=125, uneven_db=9.5, fade_s=0.00096, rasp_db=-37.5, fizz_db=-37.0,
        boom_db=-42.5, boom_follows=0.98, boom_db_per_s=8.5,
        snags_per_s=38, snag_db=-30, snag_boom_db=-32.5,
        slip_rasp_db=-1.5, slip_fizz_db=-2.25, strip_lift=1.3)
    second = tear(
        (SECOND_START_S, np.inf), second_strip, second_rasp, second_fizz, edge=1,
        slips_per_s=140, uneven_db=6.5, fade_s=0.0011, rasp_db=-40.5, fizz_db=-39.0,
        boom_db=-40.5, boom_follows=0.47, boom_db_per_s=4.0,
        snags_per_s=32, snag_db=-40.0, snag_boom_db=-27.0,
        slip_rasp_db=0.0, slip_fizz_db=-4.0, strip_lift=1.64)
    direct = first + second + cracks(fade_shape=1.8) + knocks()
    rustles = handling(creases_per_s=93, crease_db=3.5)
    reflections = room(direct, onset_s=0.00071, bass_db=-7.0, bass_t60_s=0.43)
    placed = leaning(direct + card_rings(t60_s=0.023) + reflections)
    return placed + rustles + room_tone(rumble_db=-41, whine_hz=1120, whine_db=-66.0)


def record(dry):
    """Hard clip at full scale, then a steep low-pass."""
    stop_hz, stop_db = 16800, 70
    lowpass = signal.cheby2(16, stop_db, stop_hz, fs=SR, output="sos")
    return signal.sosfilt(lowpass, np.clip(dry, -1, 1))


dry = scene()
out = record(dry)
transcribe(out)
```